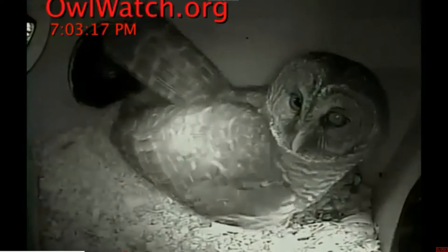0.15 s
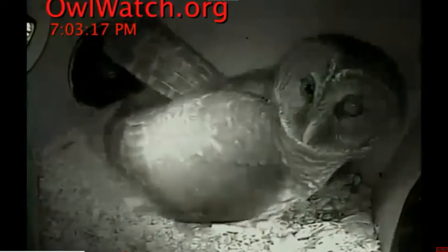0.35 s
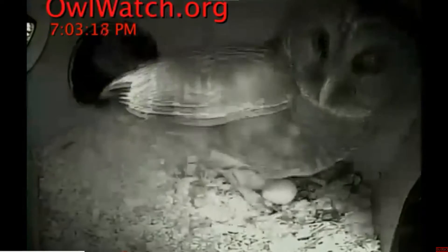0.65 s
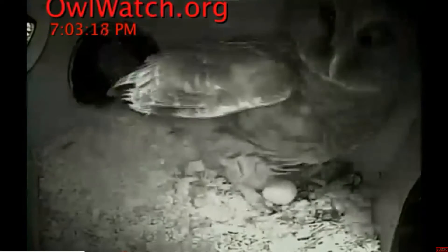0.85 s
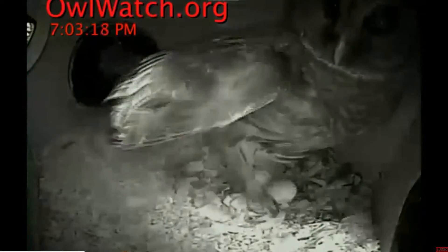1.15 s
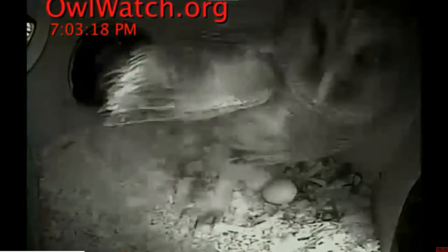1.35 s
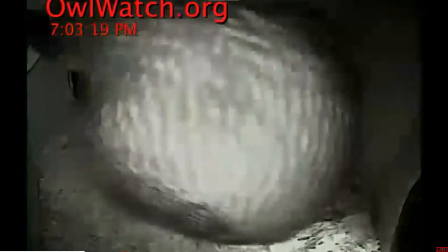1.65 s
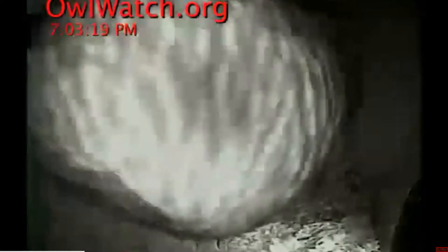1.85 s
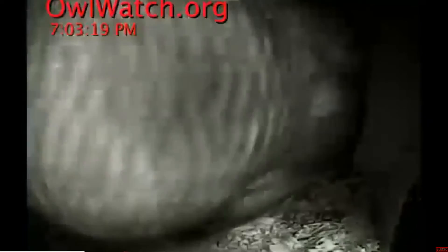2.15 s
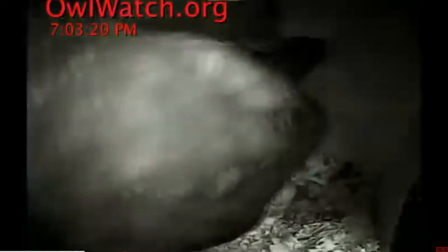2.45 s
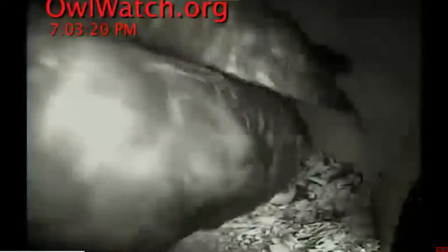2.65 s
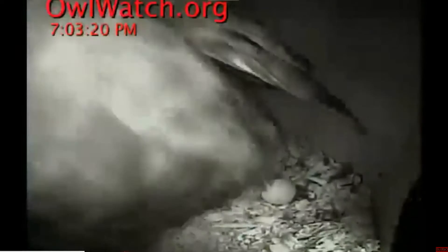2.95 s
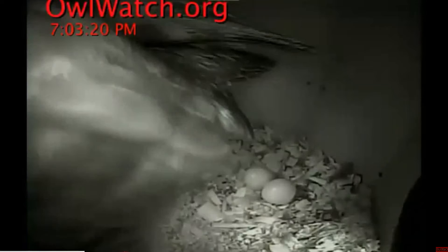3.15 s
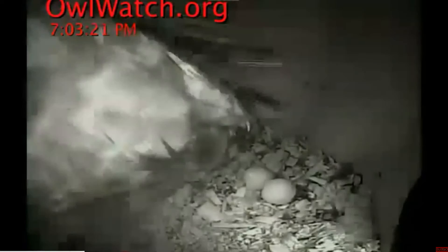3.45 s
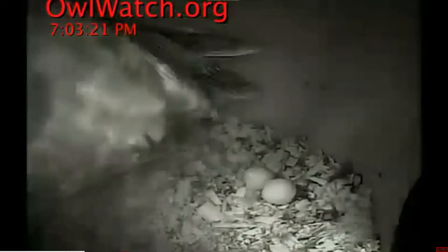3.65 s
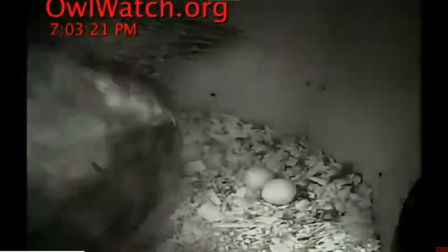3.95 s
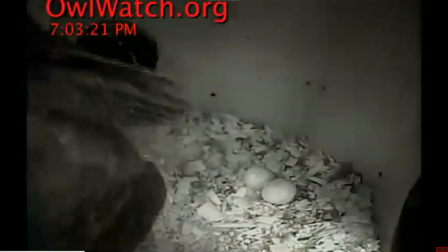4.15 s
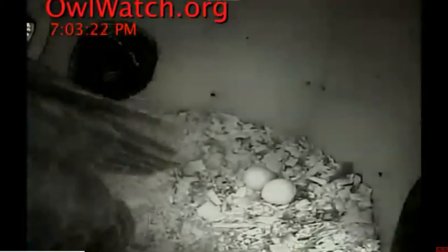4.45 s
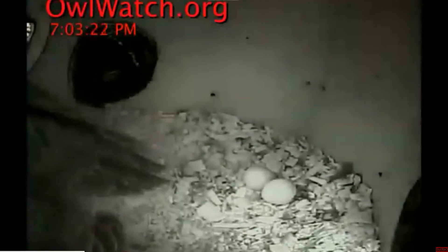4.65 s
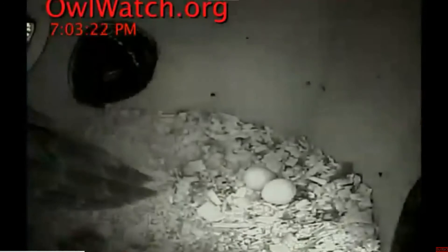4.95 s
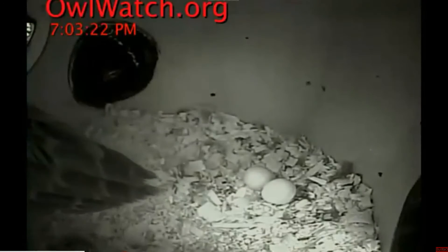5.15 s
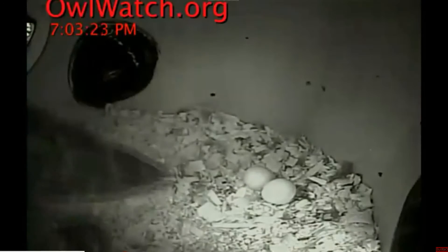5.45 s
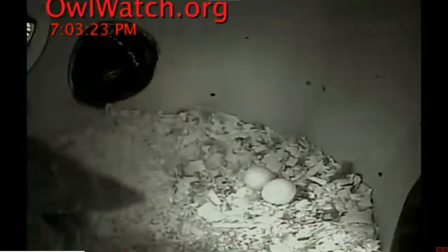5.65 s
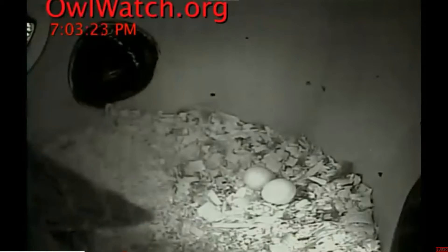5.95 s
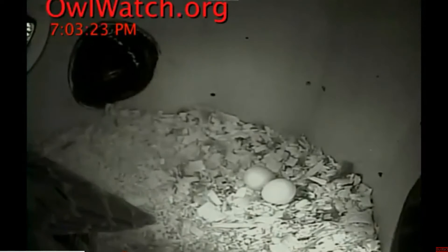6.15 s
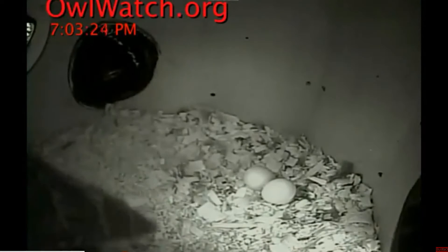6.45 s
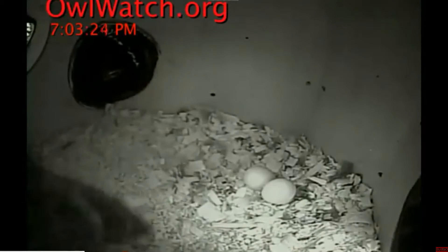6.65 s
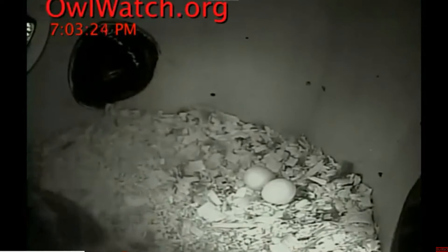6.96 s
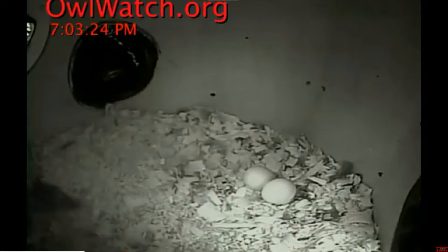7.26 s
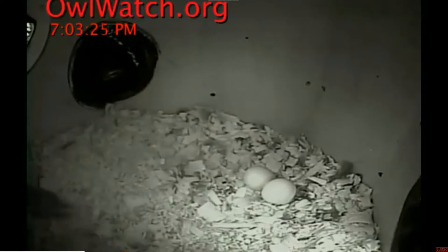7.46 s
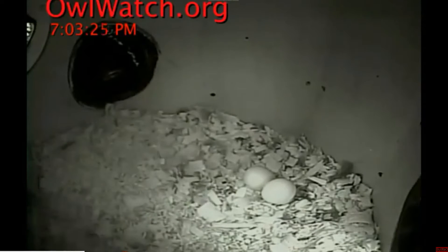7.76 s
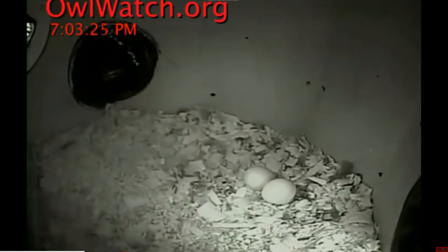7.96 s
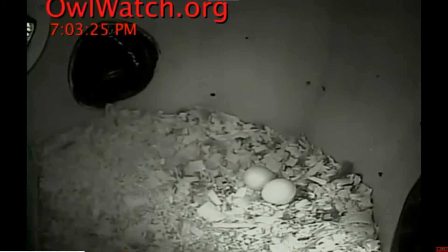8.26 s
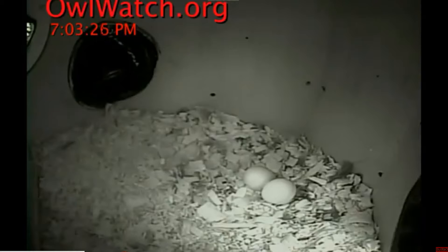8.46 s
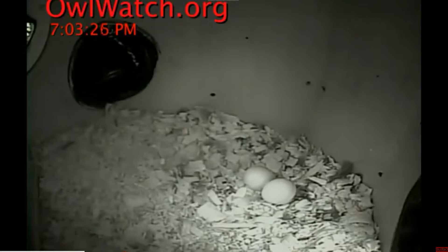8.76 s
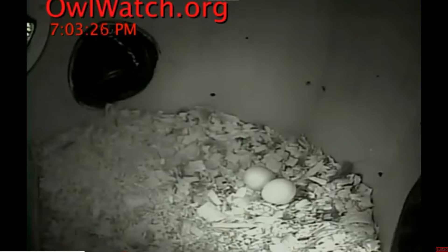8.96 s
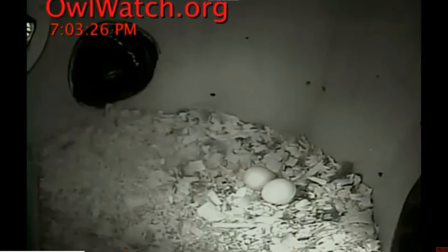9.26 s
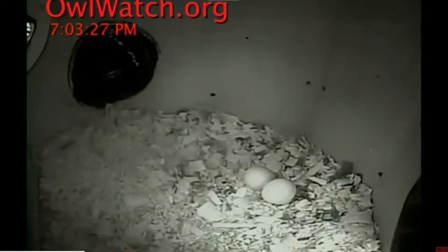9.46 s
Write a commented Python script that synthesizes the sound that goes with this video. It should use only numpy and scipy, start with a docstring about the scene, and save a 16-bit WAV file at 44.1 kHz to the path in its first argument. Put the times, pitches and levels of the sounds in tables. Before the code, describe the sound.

An owl scrambles round inside a wooden box, claws scraping and shavings crackling, then knocks hard on wood climbing out into faint insect night.

```python
"""An owl turns round in a wooden nest box, then climbs out; the microphone sits inside the box.
Wings and feet brush walls and litter: gritty noise, coloured as rustle, feather sheen and board rumble.
Feet and claws knock and scrape: short bursts of noise ring the modes of the wood. Dry shavings snap as
tiny cracks, and feathers swish once outside. Night insects, made of narrow noise bands and chirping
tones, sing faintly over a soft hiss."""
import sys
import numpy as np
from scipy import signal
from scipy.fft import rfft, irfft, next_fast_len
from scipy.io import wavfile
from scipy.ndimage import uniform_filter1d, map_coordinates

SR = 44100
rng = np.random.default_rng(int(sys.argv[2]) if len(sys.argv) > 2 else 0)


def unload_wav(signal):
    """Save mono or channel-first audio to the path in sys.argv[1] as 16-bit WAV at rate SR, clipped to [-1, 1]."""
    wavfile.write(
        sys.argv[1],
        SR,
        np.round(np.clip(np.atleast_2d(signal).T, -1, 1) * 32767).astype(np.int16),
    )


N = 423036  # length of the scene in samples

# How the rubbing is coloured: (frequency [Hz], relative level [dB])
RUSTLE_COLOUR = [(470, -35), (800, -14), (1050, 1.5), (1190, 1), (1690, 9), (2270, 7), (3910, 6.5),
                 (4950, -6), (6500, -9.5), (14300, -120)]
# How the feather sheen is coloured: (frequency [Hz], relative level [dB])
SHEEN_COLOUR = [(2500, -23.5), (3300, -7), (6000, -2), (6840, -2), (13000, -2), (15000, -9), (16000, 0)]
# Low modes of the box, also rung by the knocks: (frequency [Hz], width [Hz], relative level [dB])
BOX_MODES = [(132.5, 28, -7.5), (242, 23.8, 4.5), (319, 77, -1.5), (394.3, 59, 0.5), (468, 44.5, -6),
             (566, 26, -1), (801, 31, -10)]


def dragging():
    """Feathers and feet rub walls and litter; the boards rumble under the load."""
    catches = mottled(grit(spread_db=2.0, flutter_db=1.5), depth_db=3.0)
    rustle = unit(filtered(catches, colour(RUSTLE_COLOUR)))
    sheen = unit(filtered(catches, colour(SHEEN_COLOUR)))
    load = mottled(grit(spread_db=-0.5, flutter_db=2.0), depth_db=5.5)
    rumble = unit(filtered(load, modes(BOX_MODES)))
    return pressure() * rustle + pressure(offset_column=3) * sheen + pressure(offset_column=4) * rumble


# Strokes of the body over walls and litter: (time of full strength [s], hold [s], rustle level [dB],
# feather sheen above the rustle [dB], board rumble above the rustle [dB])
BODY_STROKES = [(0.0, 0.029, -50, -5, 3), (0.088, 0.096, -40, -6.5, -6.5), (0.225, 0.093, -54.5, 5.5, 3),
                (0.397, 0.06, -43, 0, -6.5), (0.522, 0.021, -49.5, 3.5, -7), (0.608, 0.061, -55.5, 1.5, -9),
                (0.795, 0.048, -54, -0.5, -2.5), (0.992, 0.038, -48, 0.5, -7), (1.154, 0.14, -45.5, 2, -8),
                (1.391, 0.099, -44, 0, -7.5), (1.581, .28, -51.5, 0.5, -13.5), (1.954, 0.19, -56.5, 7, -11),
                (2.176, 0.22, -55, 9, -9), (2.472, 0.11, -69.5, 9, -7), (2.632, 0.14, -61, 9, -4),
                (2.832, 0.024, -71.5, 6, 4), (2.977, 0.054, -61, -0.5, -8), (3.085, .12, -56, 3.5, -11),
                (3.293, 0.12, -59, -6, -2.5), (3.582, 0.081, -50, -13.5, -9.5), (3.738, 0.061, -62, -20, 8),
                (3.812, 0.036, -46.5, 0, -3.5), (4.906, 0.32, -72.5, 0, 7.5), (6.238, 0.2, -61.5, -1, 13.5),
                (6.485, 0.57, -77, 2.5, 4), (7.034, 0.08, -67, -23, -4.5), (7.113, 0.018, -63.5, 1, -13),
                (7.175, 0.17, -62.5, -1, 7), (7.362, 0.14, -66.5, 10, -5), (7.569, 0.16, -69.5, 11, -1.5),
                (7.818, 0.037, -64.5, -0.5, 7.5), (7.914, 0.67, -76.5, -13, 8.5),
                (8.683, 0.2, -64.5, -5.5, 8.5), (8.953, 0.64, -79, -7.5, 6.5)]


def pressure(offset_column=None):
    """Summed gain of all strokes; an offset column turns the rustle level into sheen or rumble."""
    t = np.arange(0, N + 64, 64) / SR  # one point every 64 samples is smooth enough
    power = 0
    for stroke in BODY_STROKES:
        start, hold, db = stroke[:3]
        offset_db = stroke[offset_column] if offset_column else 0
        power = power + swell(start, hold, db + offset_db, t) ** 2
    return np.interp(np.arange(N) / SR, t, np.sqrt(power))


# Weight landing on the boards: (time [s], thud peak level [dB], thud centre [Hz],
# claw edge peak level [dB], time for the contact to fade by 60 dB [s])
FOOT_KNOCKS = [(0.136, -33, 296, -38, 0.035), (0.27, -37.5, 303, -37.5, 0.12),
               (1.262, -38.5, 238, -40, 0.1), (2.664, -35, 128, -54, 0.069),
               (2.701, -36, 314, -38.5, 0.031), (2.732, -36, 386, -42, 0.11),
               (2.968, -37, 300, -42.5, 0.099), (3.254, -38, 297, -61, 0.066),
               (3.543, -47.5, 515, -52, 0.1), (3.62, -34.5, 400, -55, 0.26), (4.246, -45.5, 352, -62, 0.11),
               (4.924, -44, 370, -35.5, 0.057), (5.036, -23.5, 423, -36.5, 0.049),
               (5.096, -38, 495, -38, 0.1), (6.105, -41, 630, -40.5, 0.094), (6.212, -51, 496, -36, 0.11),
               (6.224, -14.5, 411, -26, 0.032), (6.248, -29.5, 480, -31, 0.13),
               (6.294, -37, 450, -38, 0.11), (6.321, -15, 507, -16.5, 0.049), (6.385, -31, 478, -39, 0.053),
               (6.403, -63, 420, -35, 0.074), (6.467, -58, 450, -63, 0.037), (6.5, -40.5, 280, -60, 0.15),
               (6.714, -50.5, 361, -45.5, 0.13), (6.733, -37, 543, -44, 0.057),
               (6.891, -45, 189, -66, 0.22), (6.96, -38, 228, -61, 0.08), (7.017, -43, 533, -53, 0.23),
               (7.033, -39.5, 264, -41.5, 0.21), (7.059, -35.5, 237, -51, 0.15),
               (7.178, -25.5, 236, -29, 0.095), (7.222, -36, 770, -45, 0.049), (7.267, -49, 790, -63, 0.16),
               (7.305, -37, 603, -46, .075), (7.348, -39.5, 510, -44.5, 0.085),
               (7.371, -42, 534, -52, 0.082), (7.67, -47, 285, -63, 0.26), (7.791, -44.5, 556, -42, 0.079),
               (7.973, -38, 271, -50, 0.17), (8.3, -52.5, 500, -72, 0.15), (8.381, -51, 474, -48, 0.13),
               (8.488, -46.5, 553, -53, 0.17), (8.535, -47.5, 272, -64, 0.12),
               (8.684, -46.5, 493, -59, 0.14), (8.702, -36.5, 480, -50, 0.13),
               (8.736, -39.5, 403, -43, 0.17), (8.78, -36, 520, -57, 0.064), (8.808, -28.5, 446, -30, 0.08),
               (8.841, -24, 463, -34, 0.067), (8.855, -27.5, 530, -30.5, 0.091),
               (8.892, -56, 447, -40, 0.029), (8.997, -47.5, 557, -42, 0.08),
               (9.071, -31, 494, -40.5, 0.085)]
# Upper modes of the boards, also rung by the scrapes: (frequency [Hz], width [Hz], relative level [dB])
BOARD_MODES = [(1204, 150, 5.5), (1557, 74, 5), (1824, 296, 1), (2190, 95, 5), (2370, 160, -6.5),
               (2920, 49, 3), (3334, 330, -5.5), (4260, 24, -0.5), (5300, 250, -6)]
OUT_S = 5.0  # from here on the claws grip the thicker wood of the entrance
WALL_HZ, ENTRANCE_HZ = 2760, 1650  # centre of a claw edge whose peak equals its thud
SHARPER_HZ_PER_DB = 29.5  # the centre rises as the edge gains on the thud
SETTLE, GRIP = 0.088, 0.09  # rise of the thud and hold of the claw, as shares of the fade time
CRISP_S = 0.075  # a contact with a shorter fade time than this is mostly one blow
CLAW_LEAD_S, BITE_S = .003, .0015  # the claw touches before the weight lands, and bites fast
THUMP = 0.36  # share of the foot's own short thump beside the ring of the box
PAD_HZ, CLAW_HZ = 1030, 6500  # above these the soft foot and the hard claw pass less and less


def knocks():
    """A short contact lands as one blow, a long one scuffs; thuds ring low modes, claw edges upper ones."""
    out, t = np.zeros(N), np.arange(SR // 5) / SR
    for s, thud_db, thud_hz, edge_db, t60 in FOOT_KNOCKS:
        t60 = max(t60, .01)
        settle = SETTLE * t60
        wood_hz = WALL_HZ if s < OUT_S else ENTRANCE_HZ
        edge_hz = max(wood_hz + SHARPER_HZ_PER_DB * (edge_db - thud_db), 1000)
        crunch = stepped(len(t), 128)  # pressure jumps about every 3 ms
        low = struck(BOX_MODES, thud_hz, octave_db=16)
        pad = modes([(thud_hz, 0.82 * thud_hz, 0)])  # the foot favours its own pitch
        edge = struck(BOARD_MODES, edge_hz, octave_db=7.5)

        def thud(f):
            return (THUMP * pad(f) ** 2 + low(f)) * pad(f)

        blow = (CRISP_S / t60) ** 2  # strength of the single blow beside the scuffing noise
        for db, hit, hold, lead, rise, top_hz, body in [
                (thud_db, blow, 0, settle, settle, PAD_HZ, thud),
                (edge_db, 0, GRIP * t60, CLAW_LEAD_S, BITE_S, CLAW_HZ, edge)]:
            fade = amp(-60 * np.maximum(t - hold, 0) / t60 + 2.16 * crunch)
            push = fade * np.minimum(t / rise, 1) ** 2 * rng.standard_normal(len(t))
            push[round(rise * SR)] += hit * np.linalg.norm(push)
            ring = filtered(push, lambda f: body(f) / (1 + 1j * f / top_hz) ** 2)
            add(out, s - lead, peaking(ring, db))
    return out


# Claws skidding: (time [s], peak level [dB], centre [Hz], length [s], treble hiss over the coarse band [dB])
CLAW_SCRAPES = [(0.138, -16.5, 4000, .018, 20), (0.151, -21, 4200, 0.059, -2),
                (0.413, -29.5, 4370, 0.025, -27), (0.811, -32.5, 2460, 0.01, 1),
                (0.998, -39, 3300, 0.046, -24), (1.136, -34.5, 3020, 0.019, -16),
                (1.196, -34, 2900, 0.023, -16), (1.25, -26, 4300, 0.036, -6), (1.465, -35, 3050, 0.033, -5),
                (2.184, -33, 3520, 0.052, -21.5), (2.391, -31, 4000, 0.034, 5),
                (2.733, -24.5, 3440, 0.018, 4), (2.963, -36, 3120, 0.036, -9.5),
                (3.269, -29.5, 2600, 0.033, -10.5), (3.345, -27, 2150, 0.045, -33.5),
                (3.347, -19.5, 3460, 0.047, -29.5), (3.357, -28, 5400, 0.028, -9),
                (3.578, -33.5, 3130, 0.046, -23), (3.832, -30.5, 6950, 0.021, -15.5),
                (3.923, -40, 3500, 0.011, -3), (4.922, -33.5, 4800, 0.032, -10),
                (5.089, -36, 3200, 0.022, -22), (5.105, -31.5, 2800, 0.028, -29),
                (5.217, -53.5, 3430, 0.085, -3), (6.247, -33, 3150, 0.023, -22),
                (6.317, -15, 3030, 0.015, -32), (6.387, -44, 3520, 0.069, -18),
                (7.206, -37.5, 3600, 0.069, -10), (7.832, -42, 2980, 0.037, -12),
                (7.952, -52, 3500, 0.03, -10), (8.032, -50, 2980, 0.033, -29),
                (8.841, -35.5, 2900, 0.06, -18)]


def scrapes():
    """A claw bites at once, skids, then lets go: a coarse band at the skid's centre, hiss above it."""
    out, t = np.zeros(N), np.arange(SR // 5) / SR
    for s, db, hz, length, hiss_db in CLAW_SCRAPES:
        catch = stepped(len(t), 64)  # grip changes about every 1.5 ms
        catch[:64] = 1  # the bite is always firm
        # full grip for half the length, then a fade of 60 dB in a little more than the length
        fade_db = -60 * np.maximum(t - length / 2, 0) / (1.15 * max(length, .003))
        grip = amp(fade_db + 1.36 * catch) * np.minimum(t / BITE_S, 1)
        wood = struck(BOARD_MODES, hz, octave_db=-3.5)  # the board rings along, more so away from the centre
        coarse = modes([(hz, 0.5 * hz, 0)])
        hiss = modes([(10060, 15700, hiss_db / 2)])  # half the dB, because it is squared below
        rubbing = grip * rng.standard_normal(len(t))
        skid = filtered(rubbing, lambda f: coarse(f) ** 2 * (1 + 1.2 * wood(f)) - hiss(f) ** 2)
        add(out, s, peaking(skid, db))
    return out


# The loudest shavings and claw tips snapping: (time [s], peak level [dB], centre [Hz])
LOUD_SNAPS = [(0.1428, -28, 4330), (0.239, -21.5, 3140), (0.278, -27.5, 4600), (0.817, -25.5, 2360),
              (1.04, -39, 3500), (1.138, -28, 2960), (1.2725, -28.5, 5500), (1.3759, -27, 2210),
              (1.4092, -15.5, 4970), (1.442, -30.5, 3480), (1.504, -20, 2600), (1.537, -23, 4200),
              (1.553, -27.5, 4000), (1.599, -32, 6470), (1.544, -25, 7140), (2.021, -32, 6450),
              (2.146, -26, 11000), (2.3181, -15, 6440), (2.7003, -30.5, 4000), (5.111, -36.5, 2200),
              (8.742, -45, 4100), (9.205, -49, 6900)]
SMALL_SNAPS, SMALL_HZ = 450, 4000  # number of chance snaps, and their middle centre
SMALL_DB, SMALL_SPREAD_DB = 5.5, 3  # least peak over the rustle gain, and average rise above that
SNAP_S, AFTER_S, AFTER_DB = 0.0044, 0.02, -8  # 60 dB fade of the crack; fade and level of the crumbling


def snaps():
    """Each snap is a crack of about a millisecond, then a faint crumbling; small ones follow the rustle."""
    out, t, rustle = np.zeros(N), np.arange(2048) / SR, pressure()
    small = []
    for _ in range(SMALL_SNAPS):
        place, octaves, rarity = rng.uniform([0, -1, 0], 1)  # place is a share of the scene
        extra_db = -SMALL_SPREAD_DB * np.log(1 - rarity)  # a few are much larger than the rest
        db = SMALL_DB + extra_db + 20 * np.log10(rustle[int(place * N)])
        small.append((place * N / SR, db, SMALL_HZ * 2 ** octaves))
    for s, db, hz in LOUD_SNAPS + small:
        fade = amp(-60 * t / SNAP_S) + amp(AFTER_DB - 60 * t / AFTER_S)
        burst = fade * rng.standard_normal(len(t))
        crack = filtered(burst, modes([(hz, 0.82 * hz, 0), (6000, 12000, -13)]))  # own ring over a wide click
        add(out, s, peaking(crack, db))
    return out


# One high swish of feathers outside: (time of full strength [s], hold [s], level [dB])
FEATHER_SWISH = (8.45, 0.16, -53)
# How the swish is coloured: (frequency [Hz], relative level [dB])
SWISH_COLOUR = [(5800, -38), (6700, -13), (7300, -7), (9500, -5), (10500, -10), (13300, -6)]
# How its higher parts are shortened: (later start [s per octave], sooner end [s per octave])
SWISH_NARROWING = [0.12, .03]


def swish():
    """A soft, patchy, high rush; its upper part comes late and leaves early."""
    s, hold, db = FEATHER_SWISH
    rush = unit(filtered(mottled(rng.standard_normal(N), depth_db=4.5), colour(SWISH_COLOUR)))
    hz, t, z = signal.stft(rush, SR, nperseg=512)
    octaves_up = np.log2(np.maximum(hz / SWISH_COLOUR[1][0], 1))[:, None]  # above the second colour point
    late, early = np.multiply.outer(SWISH_NARROWING, octaves_up)
    gain = swell(s + late, hold - late - early, db, t)
    return signal.istft(z * gain, nperseg=512)[1][:N]


# Chirps of a higher singer outside: (time [s], length [s], level [dB])
HIGH_SINGER_CHIRPS = [(4.273, 0.16, -79), (5.54, 0.13, -73.5), (6.032, 0.16, -75), (8.001, 0.22, -66),
                      (8.528, 0.22, -66.5), (8.855, 0.12, -67.5), (9.09, 0.14, -67.5), (9.414, 0.17, -65.5)]
# Chirps of a lower singer outside: (time [s], length [s], level [dB])
LOW_SINGER_CHIRPS = [(4.55, 0.31, -76)]
HIGH_SINGER_HZ, LOW_SINGER_HZ = 4880, 4280
CHIRP_WIDTH_HZ, CHIRP_DRIFT_HZ = 100, 44.7  # fuzz around each pitch, and typical wander of the pitch


def chirps():
    """Each insect chirp is a fuzzy, pulsing tone that swells in and out."""
    out, t = np.zeros(N), np.arange(N) / SR
    fuzz = band(0, CHIRP_WIDTH_HZ) + 1j * band(0, CHIRP_WIDTH_HZ)
    smear = amp(0.3 * wobble(20)) * fuzz
    for hz, table in [(HIGH_SINGER_HZ, HIGH_SINGER_CHIRPS), (LOW_SINGER_HZ, LOW_SINGER_CHIRPS)]:
        arch = np.zeros(N)
        for s, length, db in table:
            progress = np.clip((t - s) / length, 0, 1)
            arch += amp(db) * np.sqrt(np.abs(np.sin(np.pi * progress)))
        cycles = np.cumsum(hz + CHIRP_DRIFT_HZ * wobble(4.3)) / SR
        out += arch * np.real(smear * np.exp(2j * np.pi * cycles))
    return out


# How the air and microphone hiss in the box is coloured: (frequency [Hz], relative level [dB])
HISS_COLOUR = [(60, -62.5), (168, -9), (300, -2.5), (600, -9), (830, -22), (1230, -12), (4000, -18),
               (5300, -28.5), (5900, -23), (8500, -24.5), (9200, -20), (12800, -18.5), (13400, -24.5),
               (15200, -21.5), (15700, -13.5), (16200, -15)]
HISS_DB = -69.5  # middle level
# Bands of the farther insect chorus: (frequency [Hz], half width [Hz])
CHORUS_BANDS = [(4800, 510), (11350, 340), (12250, 250)]
# Middle level of each of those bands before it is made patchy: (level [dB])
CHORUS_LEVELS = [-77.5, -80, -90]
# A wide high chorus swells: (time [s], level [dB])
SHIMMER_LEVEL = [(0, -79), (5.8, -77.5), (7, -68.5), (7.9, -68.5), (8.9, -64), (9.6, -69)]
# How the wide high chorus is coloured: (frequency [Hz], relative level [dB])
SHIMMER_COLOUR = [(8600, -35), (9000, -4.5), (10500, 1.5), (12600, 2), (13500, -11.5), (15000, 1)]


def night():
    """Nearly steady hiss, fuzzy insect bands of wavering level, and a wide high chorus: all shaped noise."""
    hiss = unit(filtered(mottled(rng.standard_normal(N), depth_db=4.2), colour(HISS_COLOUR)))
    out = amp(HISS_DB + 0.21 * wobble(1.7)) * hiss
    for (hz, width), db in zip(CHORUS_BANDS, CHORUS_LEVELS):
        waver_db = 0.52 * wobble(4.5) + 1.2 * wobble(7.4)
        out += amp(db + waver_db) * mottled(band(hz, width), depth_db=5.5)
    shimmer_db = np.interp(np.arange(N) / SR, *np.transpose(SHIMMER_LEVEL))
    shimmer = unit(filtered(mottled(rng.standard_normal(N), depth_db=3.0), colour(SHIMMER_COLOUR)))
    return out + amp(shimmer_db) * shimmer


def amp(db):
    """Gain of a level in dB."""
    return 10 ** (np.asarray(db) / 20)


def unit(x):
    """The sound scaled to rms 1."""
    return x / np.sqrt(np.mean(x ** 2) + 1e-20)


def peaking(x, db):
    """The sound scaled so that its highest peak has the given level."""
    return amp(db) * x / np.abs(x).max()


def add(track, s, sound):
    """Mixes a sound into the track at time s."""
    part = track[round(s * SR):][:len(sound)]
    part += sound[:len(part)]


def filtered(x, response):
    """The sound passed through a complex response of frequency."""
    m = next_fast_len(len(x) + 4096)
    return irfft(rfft(x, m) * response(np.fft.rfftfreq(m, 1 / SR)), m)[:len(x)]


def colour(points):
    """Gain read from (frequency [Hz], level [dB]) points on a log axis."""
    f, v = np.transpose(points)
    return lambda hz: amp(np.interp(np.log(hz + 1), np.log(f + 1), v, -120, -120))


def modes(table):
    """Response of a body that rings at several resonances, added with alternating sign."""
    def response(f):
        total = 0
        for k, (c, width, db) in enumerate(table):
            total = total + (-1) ** k * amp(db) * 1j * f * width / (c * c - f * f + 1j * f * width)
        return total
    return response


def struck(table, hz, octave_db):
    """The modes as one contact finds them: each loses octave_db per octave from hz and varies by chance."""
    return modes([(c, width, db - octave_db * abs(np.log2(c / hz)) + rng.normal(0, 2.5))
                  for c, width, db in table])


def band(hz, width):
    """Narrow noise of rms 1 around one frequency."""
    return unit(filtered(rng.standard_normal(N), lambda f: np.exp(-((f - hz) / width) ** 2)))


def wobble(rate):
    """A smooth random curve, rate knots a second."""
    knots = rng.standard_normal(int(N * rate / SR) + 4)
    return map_coordinates(knots, [np.arange(N) * rate / SR])


def stepped(length, step):
    """A random curve that jumps to a new value every few samples."""
    return np.repeat(rng.standard_normal(length // step + 1), step)[:length]


def grit(spread_db, flutter_db):
    """Noise of uneven micro-contacts: spiky sizes that bunch into short catches."""
    return rng.standard_normal(N) * amp(spread_db * wobble(900) + flutter_db * wobble(45))


def mottled(x, depth_db):
    """The colour shifts in patches: random gain, smooth over about 200 Hz and 50 ms."""
    z = signal.stft(x, nperseg=512)[2]
    field = uniform_filter1d(rng.standard_normal(z.shape), size=2, axis=0)
    field = uniform_filter1d(field, size=9, axis=1)
    return signal.istft(z * amp(depth_db * unit(field)), nperseg=512)[1][:N]


RISE_DB_PER_S, FALL_DB_PER_S = 228.5, 225


def swell(s, hold, db, t):
    """Gain that climbs steadily in dB up to s, holds, then sinks."""
    rise_db = RISE_DB_PER_S * np.maximum(s - t, 0)
    fall_db = FALL_DB_PER_S * np.maximum(t - s - hold, 0)
    return amp(db - rise_db - fall_db)


def scene():
    """Everything, heard at one point in the box."""
    owl = dragging() + knocks() + scrapes() + snaps() + swish()
    return (owl + chirps() + night())[None]


LOW_HZ, TOP_HZ = 64, 15800  # corner of each bass-cut stage, and band limit


def record(dry):
    """The small microphone drops the bass steeply and keeps nothing above its band limit."""
    def response(hz):
        bass_cut = (1j * hz / (LOW_HZ + 1j * hz)) ** 4  # four equal stages
        return bass_cut * (hz < TOP_HZ)
    return filtered(dry[0], response)[None]


dry = scene()
out = record(dry)
unload_wav(out)
```